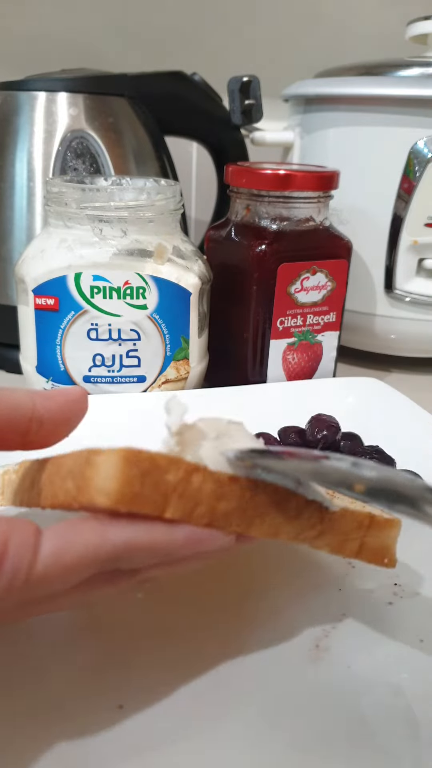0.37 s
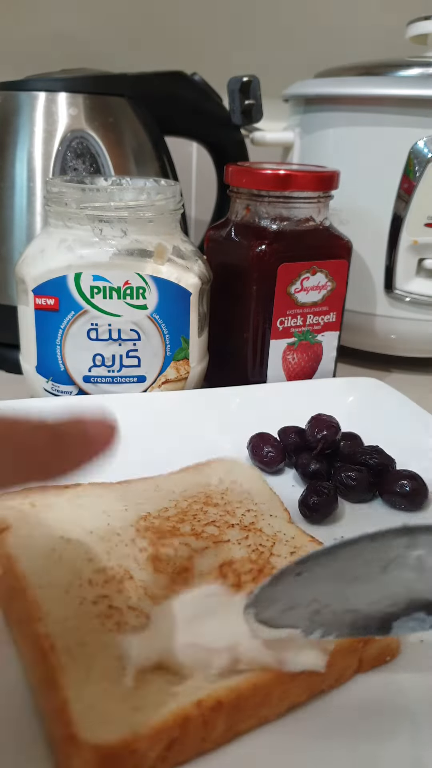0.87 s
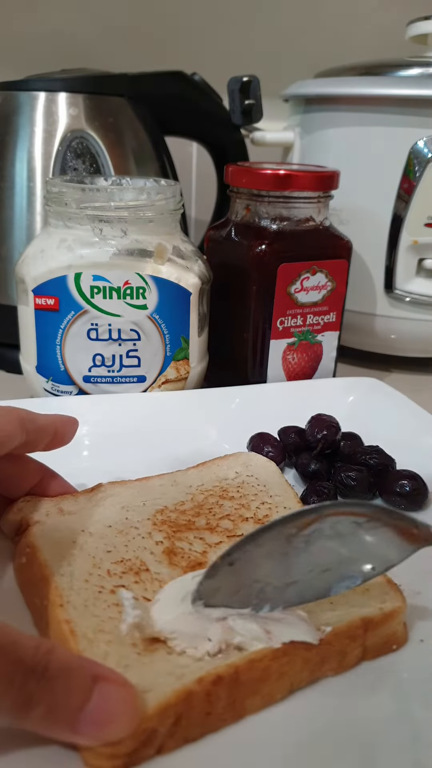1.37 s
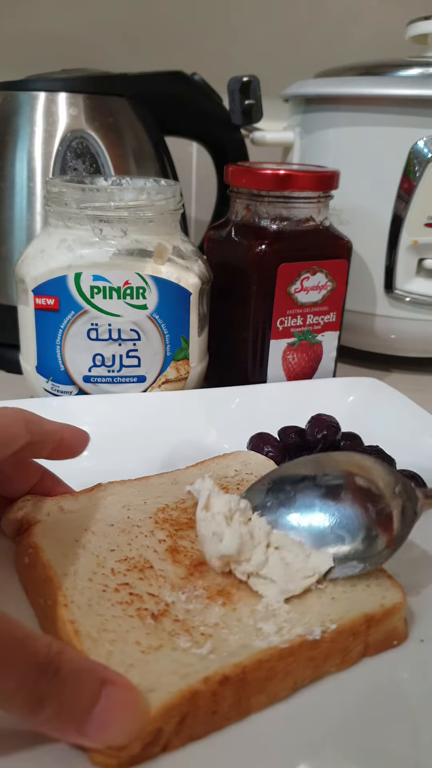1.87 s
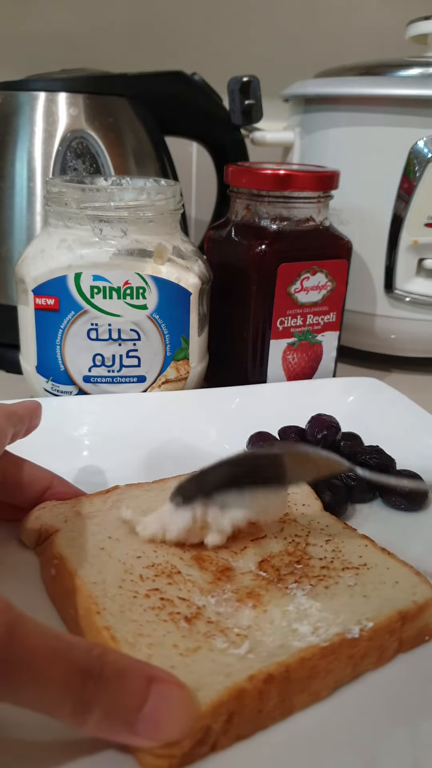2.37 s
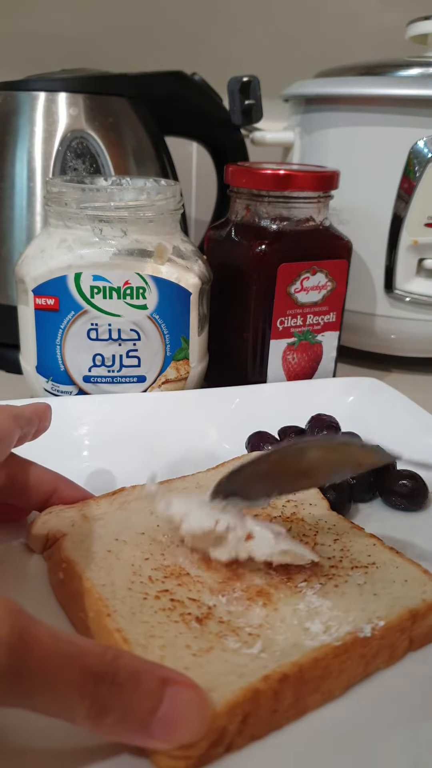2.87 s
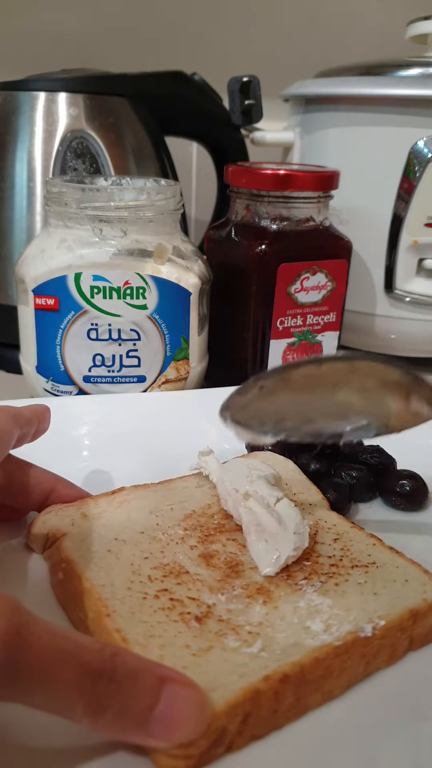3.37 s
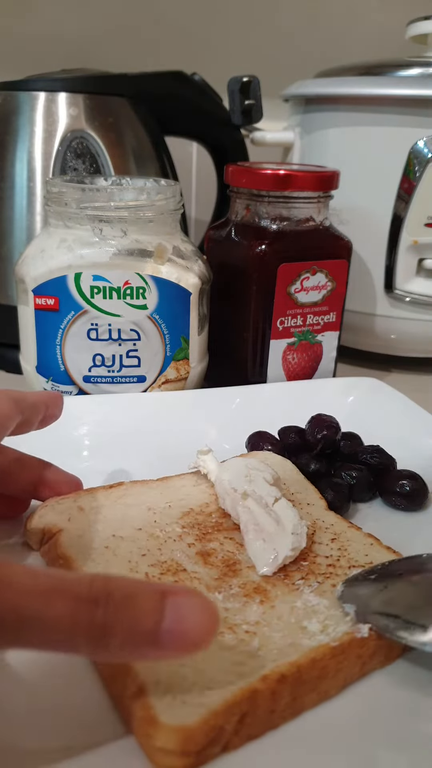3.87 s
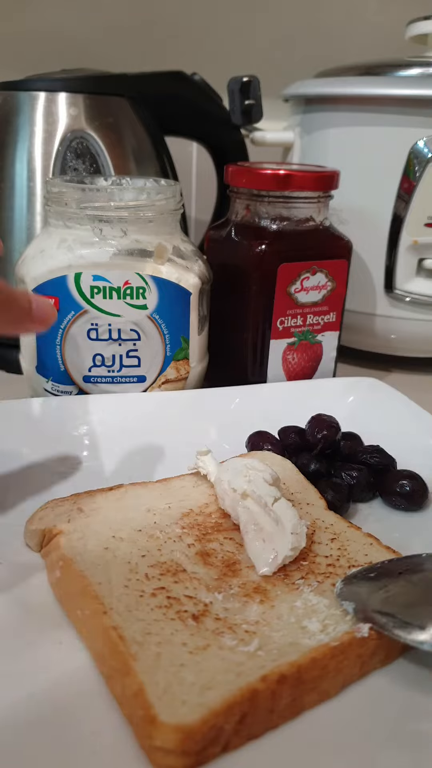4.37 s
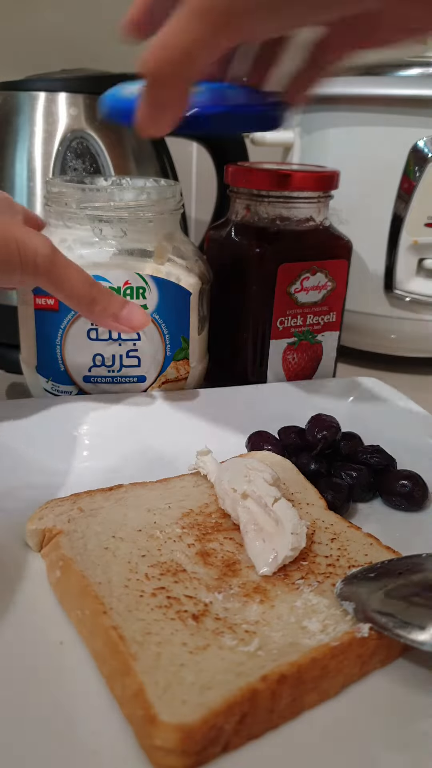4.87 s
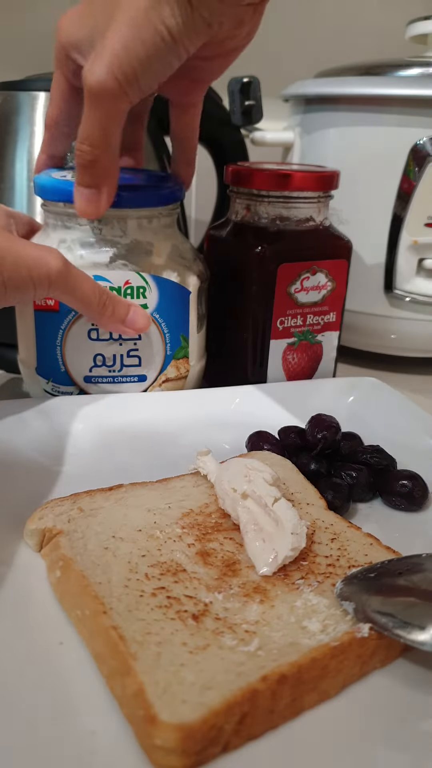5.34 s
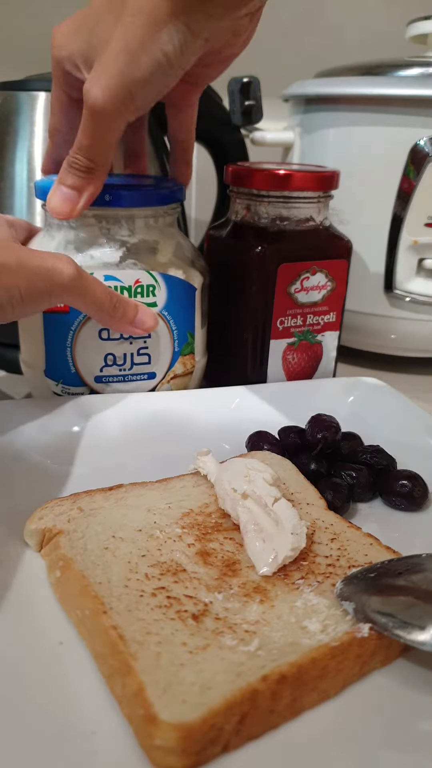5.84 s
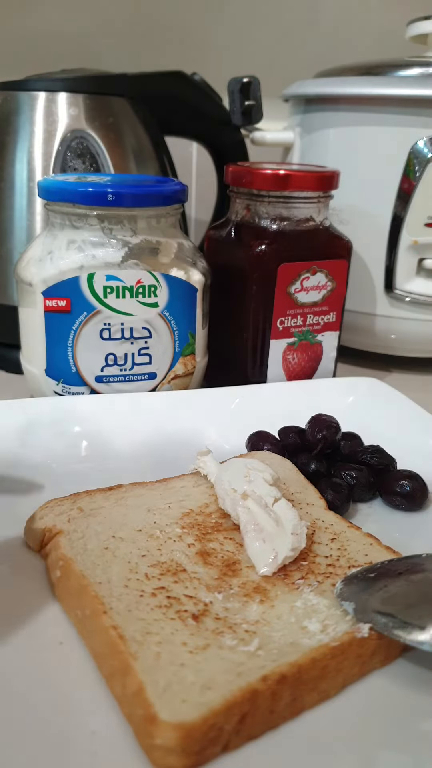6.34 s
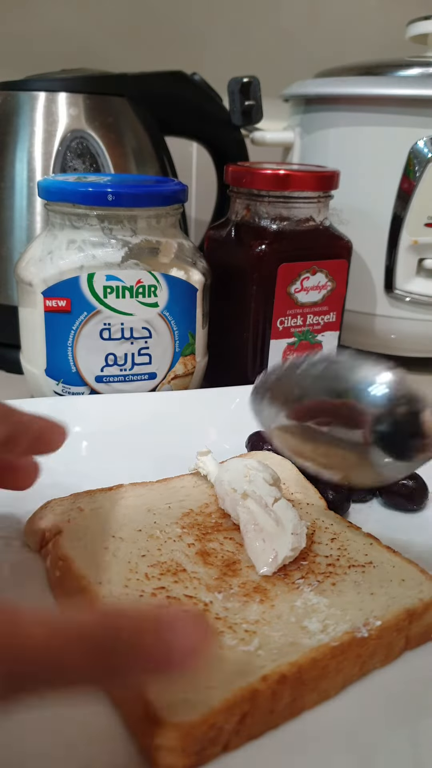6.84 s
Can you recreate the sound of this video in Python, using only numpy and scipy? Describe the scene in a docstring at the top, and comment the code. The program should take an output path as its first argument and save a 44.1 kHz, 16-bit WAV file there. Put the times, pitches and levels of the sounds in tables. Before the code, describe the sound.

In a quiet kitchen, soft spreading on toast, a sharp spoon clack on a plate, then a lid knocks and screws onto a glass jar.

```python
"""A quiet kitchen: soft cheese is spread on toast, the spoon is laid on the plate, a plastic lid is picked up,
set on a glass jar and screwed shut, then the spoon is lifted and the plate rocks to rest.
Knocks ring the modes of each body with a noisy crack on top; sleeves and fingers rustle as coloured noise.
A low appliance hum of noise and wavering tones lies below; two unlike microphone ports listen from close by."""
import sys
import numpy as np
from scipy import signal
from scipy.fft import rfft, irfft
from scipy.io import wavfile

SR = 44100
rng = np.random.default_rng(int(sys.argv[2]) if len(sys.argv) > 2 else 0)


def invert_db(level):
    """Linear amplitude ratio for a level in decibels (20 dB per decade), elementwise."""
    return 10 ** (np.asarray(level, dtype=float) / 20)


def generate_wav(signal):
    """Clip the signal to [-1, 1] and save it as 16-bit WAV at the path in sys.argv[1]."""
    frames = np.transpose(np.atleast_2d(signal))
    scaled = np.clip(frames, -1, 1) * 32767
    pcm = np.round(scaled).astype(np.int16)
    wavfile.write(sys.argv[1], SR, pcm)


N = 307367  # length in samples

# How alike the left and right sounds are. Each row: frequency in Hz, likeness from 0 to 1.
LIKENESS = [(200, 0.87), (450, 0.72), (800, 0.34), (1200, 0.072), (14000, 0.0067)]


def at_hz(points, hz):
    """Reads a (Hz, value) table on a log-frequency axis."""
    points = np.array(points)
    return np.interp(np.log(np.maximum(hz, 1)), np.log(points[:, 0]), points[:, 1])


def rms_one(x):
    """Scales to unit rms."""
    return x / np.sqrt(np.mean(x ** 2) + 1e-20)


def drift(rate_hz):
    """Slow random wandering of unit spread: smoothed noise drawn 40 times a second."""
    steps = rng.standard_normal(int(N / SR * 40) + 2)
    smooth = signal.lfilter([1], [1, -np.exp(-2 * np.pi * rate_hz / 40)], steps)
    return np.interp(np.arange(N) / SR * 40, np.arange(len(smooth)), rms_one(smooth))


def pair(mid, side, hz):
    """Makes left and right spectra that share the bass and part ways in the treble."""
    alike = np.clip(at_hz(LIKENESS, hz), 0, 1)
    return np.sqrt(1 + alike) * mid + np.sqrt(1 - alike) * side * np.array([[1], [-1]])


def hiss(spectrum, flicker_db):
    """Stereo noise of a given colour, set to unit rms before its level flickers a little."""
    hz = np.arange(N // 2 + 1) * SR / N
    inside = (hz > spectrum[0][0]) & (hz < spectrum[-1][0])
    mid, side = rfft(rng.standard_normal((2, N))) * invert_db(at_hz(spectrum, hz)) * inside
    return rms_one(irfft(pair(mid, side, hz), N)) * invert_db(flicker_db * drift(9.4))


def kitchen(x):
    """Diffuse reflections: octave bands of noise, each dying at its own rate, unlike at the two ports."""
    # Time for the echo to fall by 60 dB. Each row: frequency in Hz, time in seconds.
    fade_times = [(200, 0.45), (1500, 0.35), (5000, 0.32), (13000, 0.26)]
    t, tail = np.arange(SR // 2) / SR, 0
    for low in 100 * 2. ** np.arange(8):
        centre = 1.4 * low
        octave = signal.butter(2, [low, min(2 * low, .45 * SR)], "band", fs=SR, output="sos")
        mid, side = signal.sosfilt(octave, rng.standard_normal((2, len(t))))
        tail = tail + pair(mid, side, centre) * invert_db(-60 * t / at_hz(fade_times, centre))
    tail = tail * np.clip(t / 0.0019, 0, 1)   # the first reflections take about two milliseconds to build
    tail = tail / np.sqrt((tail ** 2).sum(1).mean())
    return signal.fftconvolve(x, tail, axes=1)[:, :N]


def rumble():
    """Very low noise, coloured and flickering, under the hum."""
    # Colour of the noise. Each row: frequency in Hz, relative level in dB per Hz.
    colour = [(15, -5), (25, 1), (45, -5), (62, -5.5), (85, -19), (110, -12)]
    return invert_db(-70.5) * hiss(colour, flicker_db=1.5)


def hum_noise():
    """The broad part of the hum: coloured noise, roughly steady."""
    # Colour of the noise. Each row: frequency in Hz, relative level in dB per Hz.
    colour = [(59, -42), (100, -5.5), (134, -1), (168, -2.5), (231, 1.5), (340, -6.5), (415, 4),
              (474, -9.5), (541, -3.5), (897, -13), (1530, -7.5), (2070, -28), (2400, -28), (3120, -67),
              (5280, -120)]
    # Its level over time. Each row: time in seconds, level in dB.
    levels = [(0.0, -57), (0.74, -55.5), (4.95, -59), (5.22, -51.5), (5.3, -55.5), (6.46, -58.5),
              (6.64, -53), (6.97, -54)]
    return invert_db(np.interp(np.arange(N) / SR, *np.transpose(levels))) * hiss(colour, flicker_db=1.4)


def hum_tones():
    """Narrow parts of the hum: sines that waver at random in strength and phase."""
    # A narrow band near 120 Hz, fluctuating at random. Each row: time in seconds, level in dB.
    band_level = [(0.0, -72), (0.11, -56), (0.21, -65), (1.26, -61.5), (1.73, -68), (2.39, -57),
                  (2.56, -74), (2.68, -60), (2.97, -77), (3.53, -59.5), (3.61, -71), (3.75, -59),
                  (4.54, -75), (4.93, -55), (4.99, -69), (6.17, -69), (6.81, -58), (6.97, -82)]
    # The other tones. Each row: frequency in Hz, level in dB, waver in dB.
    tones = [(62, -73, 3.5), (219, -71, 1.5), (244.2, -69, 7), (298.3, -69.5, 3.5), (417, -66.5, 1.6),
             (534, -74.5, 2)]
    t, band_hz = np.arange(N) / SR, 119.8
    band_phase = 2 * np.pi * band_hz * t + 1.06 * drift(2.2)
    out = invert_db(np.interp(t, *np.transpose(band_level))) * np.sin(band_phase)
    for hz, db, waver_db in tones:
        strength = invert_db(db + waver_db * drift(4.3))
        out = out + strength * np.sin(2 * np.pi * hz * t + 1.67 * drift(0.91))
    return np.sqrt(2) * out   # a sine of unit rms peaks at the root of two


def rustle():
    """Sleeves and fingers: a darker and a brighter noise, each with its own changing level."""
    # Colours of the two noises. Each row: frequency in Hz, relative level in dB per Hz.
    dark_colour = [(1120, -42), (1900, -33), (2770, -0.5), (3840, -4.5), (4230, 1.5), (5450, 4.5),
                   (6250, -2.5), (7030, -3.5), (9000, -34), (11700, -50), (19800, -120)]
    bright_colour = [(4120, -30), (7000, 1.5), (8470, -4.5), (9910, -2), (10900, -4), (13300, -6),
                     (14800, -13.5)]
    # Loudness over time. Each row: time in seconds, darker rustle in dB, brighter rustle in dB.
    loudness = [(0.0, -62.5, -62.5), (0.45, -61, -64), (0.79, -59.5, -60), (0.97, -71, -68),
                (1.26, -65.5, -65.5), (1.67, -58.5, -59), (2.44, -61.5, -61), (2.64, -62.5, -63.5),
                (3.71, -58.5, -60), (3.94, -60, -66), (4.13, -65, -66.5), (4.6, -62.5, -59.5),
                (4.95, -61, -61.5), (5.14, -53.5, -59.5), (5.98, -70, -66), (6.48, -62, -64),
                (6.6, -52, -55.5), (6.97, -61, -60.5)]
    s, *columns = np.transpose(loudness)
    dark_db, bright_db = [np.interp(np.arange(N) / SR, s, column) for column in columns]
    dark = invert_db(dark_db) * hiss(dark_colour, flicker_db=1.5)
    return dark + invert_db(bright_db) * hiss(bright_colour, flicker_db=-0.5)


def strokes():
    """Each stroke is grainy friction noise around its own centre that swells and fades."""
    # Spoon, fingers and sleeves brushing past. Each row: loudest moment in seconds, rise in seconds,
    # fall in seconds, level in dB, centre in Hz.
    brushes = [(0.272, 0.049, 0.037, -60, 4660), (.55, 0.017, 0.046, -54, 5300),
               (0.86, 0.031, 0.025, -54, 5300), (1.57, 0.028, 0.032, -51, 5900),
               (1.96, 0.038, 0.062, -58, 4460), (2.201, 0.016, 0.082, -61, 3800),
               (2.489, .04, 0.071, -44, 3300), (2.832, 0.011, 0.13, -59, 5750),
               (3.15, 0.044, 0.22, -61.5, 6200), (3.436, .008, 0.1, -52, 5200),
               (3.649, 0.028, 0.05, -53, 4470), (3.79, .012, 0.067, -55, 9600),
               (4.36, 0.033, 0.064, -54, 5000), (5.63, 0.018, 0.26, -59.5, 3200),
               (6.13, 0.056, 0.052, -51, 5240), (6.88, 0.026, 0.081, -56, 3300)]
    # The lid's thread rubbing on the jar. Each row: loudest moment in seconds, rise in seconds,
    # fall in seconds, level in dB, centre in Hz.
    thread_rubs = [(5.12, .04, 0.022, -43, 580), (5.19, .013, 0.017, -37, 614),
                   (5.27, .03, 0.037, -43.5, 510)]
    out, t = np.zeros((2, N + SR)), np.arange(SR) / SR - .2   # the loudest moment is at t = 0
    hz = np.arange(SR // 2 + 1) + 1
    for s, rise, fall, db, centre_hz in brushes + thread_rubs:
        # strokes firmer than -60 dB are broader in colour
        width_oct = .27 + .024 * max(db + 60, 0)
        grains = rng.standard_normal((2, SR)) * invert_db(2.0 * rng.standard_normal(SR))
        band = np.exp(-.5 * (np.log2(hz / centre_hz) / width_oct) ** 2)
        swell = np.exp(-.5 * (t / np.where(t < 0, rise, fall)) ** 2)
        friction = rms_one(irfft(pair(*rfft(grains), hz) * band, SR))
        at = round((s + t[0]) * SR)
        out[:, at:at + SR] += invert_db(db) * swell * friction
    return out[:, :N]


def contacts(events, modes, fall_below, crack_db, longest_s, detune, split_db, treble_damping=0):
    """Each contact feeds the body's modes while it lasts and spits a flurry of clicks; its colour peaks at a focus.

    An event is (seconds, strength in dB, contact length in seconds, focus in Hz, fall above it in dB per octave).
    """
    out, t = np.zeros((2, N + SR)), np.arange(SR // 4) / SR
    hz, mode_db, t60 = np.repeat(modes, 3, axis=0).T[:, :, None]   # each mode and two neighbours
    neighbour = (np.arange(len(hz)) % 3 > 0)[:, None]
    # with treble damping, the high modes are stopped sooner
    limit_s = longest_s * (hz[0] / hz) ** treble_damping
    freqs = np.arange(len(t) // 2 + 1) * SR / len(t) + 1
    for s, strength_db, length, focus_hz, fall_above in events:
        contact = np.exp(-t / max(length, .0003))
        mode_strength = invert_db(mode_db + split_db * neighbour + 3.2 * rng.standard_normal(hz.shape))
        # an uneven, loosely held body splits every mode into close neighbours that beat
        split_hz = hz * (1 + detune * neighbour * rng.standard_normal(hz.shape))
        angle = 2 * np.pi * (split_hz * t + rng.random(hz.shape))
        # each mode reaches the right port with a phase of its own, more so in the treble
        slip = np.pi * (1 - at_hz(LIKENESS, hz)) ** 2 * (2 * rng.random(hz.shape) - 1)
        # while contact lasts the ring builds up and is damped less than it is fed
        fading = invert_db(-60 * (t - length * (1 - contact)) / np.minimum(t60, limit_s))
        swell = mode_strength * (1 - contact ** 4) * fading
        ring = np.array([(swell * np.sin(np.float32(angle + port * slip))).sum(0) for port in (0, 1)])
        # the crack: uneven noise that dies with the contact
        unevenness = np.sqrt(np.abs(rng.standard_normal(len(t))))
        mid, side = rfft(rng.standard_normal((2, len(t))) * unevenness * contact)
        octaves = np.log2(freqs / focus_hz)
        colour = invert_db(np.where(octaves < 0, fall_below * octaves, -fall_above * octaves))
        colour = colour / (1 + (190 / freqs) ** 4)   # small bodies radiate no deep bass
        ring = irfft(rfft(ring) * colour, len(t))
        crack = irfft(pair(mid, side, freqs) * colour, len(t))
        hit = ring / np.abs(ring).max() + invert_db(crack_db) * crack / np.abs(crack).max()
        early_rms = np.sqrt(np.mean(hit[:, :SR // 100] ** 2))   # over the first 10 ms
        at = round(s * SR)
        out[:, at:at + len(t)] += invert_db(strength_db - 6) * hit / early_rms * (t < .23)
    return out[:, :N]


def crust_ticks():
    """Toast crust cracking: short, bright, noisy ticks."""
    # The cracks. Each row: start in seconds, strength in dB, contact length in seconds.
    ticks = [(0.169, -41, 0.0067), (1.685, -44.5, 0.0023), (1.754, -39, 0.01), (1.792, -38.5, 0.012),
             (1.815, -41, 0.0023), (1.8223, -33, 0.01), (2.41, -45, 0.0028)]
    # What the crust rings with. Each row: frequency in Hz, strength in dB, time to fall 60 dB in seconds.
    crust = [(1410, 5.5, 0.06), (3434, -4.5, 0.035), (5300, -5, 0.0058), (7330, -5.5, 0.017),
             (9900, -6, 0.017), (13000, -1, 0.044)]
    events = [row + (5000, -1.5) for row in ticks]   # the negative fall lifts the treble above 5000 Hz
    return contacts(events, crust, fall_below=2.4, crack_db=3.0, longest_s=.015, detune=0.057, split_db=4.0)


def lid_ticks():
    """Thin ticks of the plastic lid, with more crack than ring."""
    # The ticks. Each row: start in seconds, strength in dB, contact length in seconds, focus in Hz,
    # fall above the focus in dB per octave.
    ticks = [(4.5154, -31, 0.0015, 3020, 14), (4.5228, -28.5, 0.0047, 2870, 10.4),
             (4.5518, -21, 0.004, 2900, 9.5), (5.577, -35, 0.0027, 3200, 10.5),
             (5.5832, -27.5, 0.004, 4100, 16), (5.8227, -47, 0.0021, 4640, 7)]
    # What the lid rings with. Each row: frequency in Hz, strength in dB, time to fall 60 dB in seconds.
    lid = [(1620, 3, 0.04), (3010, -6.5, 0.024), (3520, -17, 0.06), (3900, -33, 0.29), (4700, -11, 0.12),
           (4800, -22, 0.062), (5400, -14, 0.087), (5580, 3.5, 0.037), (6900, -11, 0.16), (7560, -28, 0.17),
           (8064, -25, 0.25), (8516, -39, 5.0), (9600, -17, 0.27), (9835, -62, 0.045), (10450, -27, 0.13),
           (10700, -10, 0.048)]
    return contacts(ticks, lid, fall_below=11.4, crack_db=4.0, longest_s=0.14, detune=0.0327, split_db=-2.5)


def lid_on_jar():
    """The lid is set on the glass jar, which rings freely; its high modes die sooner."""
    # The knock. Each row: start in seconds, strength in dB, contact length in seconds, focus in Hz,
    # fall above the focus in dB per octave.
    knock = [(5.033, -8.5, 0.0052, 780, 2.3)]
    # What the jar rings with. Each row: frequency in Hz, strength in dB, time to fall 60 dB in seconds.
    jar = [(764, -9.5, 0.46), (1395, -12.5, 0.028), (2480, -11, 0.058), (2790, -9, 0.32),
           (3070, 8.5, 0.019), (4640, -1.5, 0.024), (4870, 1.5, 0.031), (5440, -8.5, 0.051),
           (5500, -18, 0.37), (6830, -14, 0.29), (10300, -32.5, 0.084), (10000, -34, 0.2),
           (10900, -33, 0.16), (10640, -21, 0.17), (10960, -8.5, 0.09), (11980, -26.5, 0.25),
           (12530, -74, 5.0), (12700, -29.5, 0.1), (13700, -31.5, 0.074), (13800, -6, 0.12)]
    return contacts(knock, jar, fall_below=4.5, crack_db=-4.5, longest_s=0.25, detune=0.031, split_db=-13,
                    treble_damping=.6)


def lid_screwed_shut():
    """The lid knocks on the thread as it is turned and snaps tighter on its seat; the held jar rings briefly."""
    # Knocks on the thread. Each row: start in seconds, strength in dB, contact length in seconds,
    # focus in Hz, fall above the focus in dB per octave.
    knocks = [(5.134, -19, 0.009, 650, 6.5), (5.17, -22.5, 0.0034, 706, 2.1),
              (5.207, -14, 0.0062, 523, 4.6), (5.221, -19.5, 0.013, 450, 9.8),
              (5.237, -24.5, 0.0074, 398, 4.3), (5.296, -39, 0.004, 380, 2.7),
              (5.452, -47, 0.0063, 541, 4.1), (5.55, -24, 0.0057, 428, 4.3), (5.567, -28, 0.0046, 430, 8.5),
              (5.583, -23.5, 0.00057, 394, 2.2), (5.727, -42.5, 0.0068, 547, 13),
              (5.808, -34, 0.0035, 705, 6.1), (5.839, -37.5, 0.0029, 730, 8)]
    # Snaps on the seat. Each row: start in seconds, strength in dB, contact length in seconds.
    snap_rows = [(5.532, -39, .012), (5.762, -23.5, .0045), (6.01, -40, .0067), (6.026, -21.5, .006),
                 (6.033, -12, .0018)]
    # What the held jar rings with. Each row: frequency in Hz, strength in dB, time to fall 60 dB in seconds.
    held_jar = [(394, 1.5, 0.061), (497, 1, 0.032), (589, -3, 0.021), (626, -11, 0.025), (714, 0.5, 0.063),
                (963, -23, 0.089), (1280, 3, 0.011), (1430, 1, 0.031), (1592, 3.5, 0.014),
                (2370, -4.5, 0.034), (2880, 0, .04), (3553, 4, 0.021), (3800, -8.5, 0.058),
                (4270, -1.5, 0.053), (4700, 9.5, 0.0096), (6650, -19, 0.059), (11600, -2, 0.028)]
    snaps = [row + (1360, 17) for row in snap_rows]   # focus in Hz, fall in dB per octave
    turning = contacts(knocks, held_jar, fall_below=7.1, crack_db=-4.5, longest_s=.15, detune=0.051,
                       split_db=-3.5)
    return turning + contacts(snaps, held_jar, fall_below=8, crack_db=-3, longest_s=.12, detune=0.05,
                              split_db=-4.5)


def spoon_lifted():
    """The spoon clinks as it is lifted, then gives one thin high tick; its modes ring."""
    # Clinks, and the high tick. Each row: start in seconds, strength in dB, contact length in seconds,
    # focus in Hz, fall above the focus in dB per octave.
    clink_rows = [(6.422, -33, 0.0067, 4750, 10), (6.454, -23, 0.002, 1580, 8),
                  (6.492, -22, 0.0088, 1630, 4.7), (6.508, -27, 0.002, 1620, 4),
                  (6.568, -25, 0.0022, 1280, 4)]
    high_tick = [(6.8104, -42, 0.0015, 13000, 25)]
    # What the spoon rings with. Each row: frequency in Hz, strength in dB, time to fall 60 dB in seconds.
    spoon = [(416, -14, 0.53), (1076, -13.5, 0.29), (1344, -1, 0.028), (1552, -4.5, 0.64),
             (1990, -21, 0.16), (2290, -13, 0.096), (2990, -9.5, 0.28), (3400, -15, 0.12), (4980, -17, 5.0),
             (5430, -13, 0.43), (5900, -15.5, 0.43), (6770, -14.5, 0.2), (7150, -13, 0.15),
             (7628, -15, 0.085), (9100, -39, 5.0), (9722, -11.5, 0.24), (11000, -12, 0.29),
             (12130, -41, 5.0), (13170, -17, 0.23), (14320, -38.5, 0.19)]
    clinks = contacts(clink_rows, spoon, fall_below=4.2, crack_db=-4.5, longest_s=.105, detune=0.018,
                      split_db=-6.5)
    return clinks + contacts(high_tick, spoon, fall_below=34, crack_db=-1.0, longest_s=.105, detune=0.017,
                             split_db=-5.5)


def plate_rocks(count):
    """The freed plate lands on the table top, then rocks in a quickening, fading run of duller rim touches."""
    # The landings. Each row: start in seconds, strength in dB.
    drops = [(6.645, -25), (6.66, -18), (6.682, -24)]
    # What the table top rings with. Each row: frequency in Hz, strength in dB, time to fall 60 dB in seconds.
    table_top = [(313, -4.5, 0.15), (409, -14.5, 0.07), (775, -15, 0.041), (1280, -5.5, 0.037),
                 (1535, -2.5, 0.02), (2740, -21, 0.018), (3300, -12, 0.017)]
    contact_s, focus_hz = .0025, 1350
    events = [(s, db, contact_s, focus_hz, 14) for s, db in drops]
    gaps_s = .0445 * .915 ** np.arange(count)   # each swing is shorter
    starts_s = 6.6845 + np.cumsum(gaps_s) - gaps_s
    for k, s in enumerate(starts_s):
        events.append((s, -28 - 2.1 * k, contact_s, focus_hz, 18))   # and softer
    return contacts(events, table_top, fall_below=2.7, crack_db=-5.5, longest_s=.06, detune=0.048,
                    split_db=-5.5)


def spoon_on_plate():
    """The spoon taps the plate and is laid on it; the plate's modes ring, the high ones stopped a bit sooner."""
    # The taps. Each row: start in seconds, strength in dB, contact length in seconds,
    # fall above the focus in dB per octave.
    tap_rows = [(0.328, -43, 0.0061, 8), (0.6, -49, 0.004, 15), (0.642, -43, 0.004, 8.5),
                (0.652, -33, 0.0048, 7.5), (0.897, -28.5, 0.0048, 5.5), (0.916, -33.5, 0.0035, 11),
                (3.947, -11, 0.0032, 2.5), (3.95, -14, 0.0033, 2.2), (3.959, -13, 0.0035, 4),
                (3.968, -16, 0.005, 6), (3.974, -22, 0.0049, 7)]
    # What the plate rings with. Each row: frequency in Hz, strength in dB, time to fall 60 dB in seconds.
    plate = [(1338, 1.5, 0.017), (3200, -8.5, 0.093), (309, -13, 0.36), (1572, -6.5, 0.044),
             (1944, -13, 0.27), (2960, -9.5, 0.17), (4030, -6, 0.065), (4706, -2.5, 0.85),
             (5430, 0.5, 0.063), (5810, -8.5, 0.091), (5870, -5, 0.06), (6800, -25, 0.38),
             (6820, -5.5, 0.091), (7170, 2, 0.074), (7620, -2, 0.081), (8177, -29, 0.043),
             (8600, -26, 0.092), (8400, -17, 0.14), (9000, -14, 0.2), (9200, 0.5, 0.072),
             (9530, -4.5, 0.082), (11440, -24, 0.065), (11060, 4.5, 0.057), (11100, -2, 0.3),
             (12140, -17, 0.11), (12300, 1, 0.037), (13160, 3, 0.014), (12500, -15, 0.069),
             (13300, -8, 0.53), (14700, -20, 0.13)]
    focus_hz = 1450
    taps = [(s, db, length, focus_hz, fall) for s, db, length, fall in tap_rows]
    return contacts(taps, plate, fall_below=1.5, crack_db=-0.5, longest_s=.1, detune=.025, split_db=-1.5,
                    treble_damping=.2)


def scene():
    """All contacts in the kitchen, over the hum and the rustle."""
    background = rumble() + hum_noise() + hum_tones() + rustle() + strokes()
    hits = (crust_ticks() + lid_ticks() + lid_on_jar() + lid_screwed_shut()
            + spoon_lifted() + spoon_on_plate())
    rocking = plate_rocks(count=9)
    # the plate rocks right under the microphone and is heard drier
    echo = kitchen(invert_db(-9.5) * hits + invert_db(-13.5) * rocking)
    return background + hits + rocking + echo


def band_limit(x):
    """A steep low-pass at the top of the band."""
    return signal.sosfilt(signal.butter(12, 15640, fs=SR, output="sos"), x)


def record(dry):
    """Each port has its own colour, the loudest peaks are rounded and the top is cut."""
    # How the two ports differ in colour. Each row: frequency in Hz, left minus right in dB.
    port_difference = [(200, 0.5), (450, -3), (800, -6), (1200, -10.5), (1600, -15.5), (2050, 6.5),
                       (2600, -8.5), (3500, -7.5), (4500, -10.5), (5700, -9.5), (7200, -13.5), (9000, -3),
                       (11000, -3), (13000, 7)]
    hz = np.arange(N // 2 + 1) * SR / N
    tilt = invert_db(at_hz(port_difference, hz))
    # the squared gains of the two ports always add up to two
    ports = np.sqrt(2 / (1 + tilt ** 2)) * np.array([tilt, np.ones_like(tilt)])
    heard = irfft(rfft(dry) * ports, N)
    peak_top = .75
    rounded = peak_top * np.tanh(heard / peak_top)
    top_cut = invert_db(at_hz([(14500, 0), (14800, -22), (16500, -45)], hz))   # (Hz, dB)
    mix = irfft(rfft(rounded) * top_cut, N)
    return band_limit(mix)


dry = scene()
out = record(dry)
generate_wav(out)
```